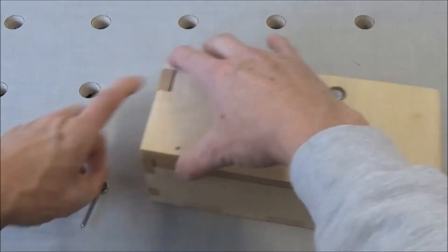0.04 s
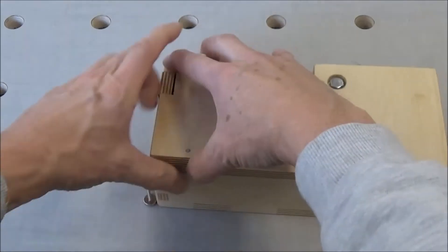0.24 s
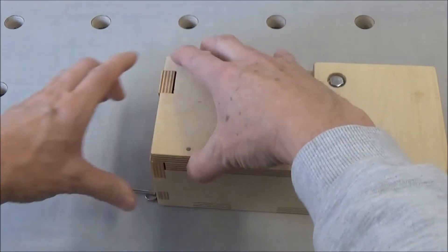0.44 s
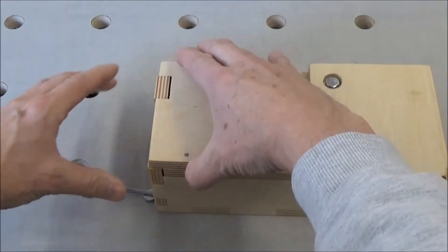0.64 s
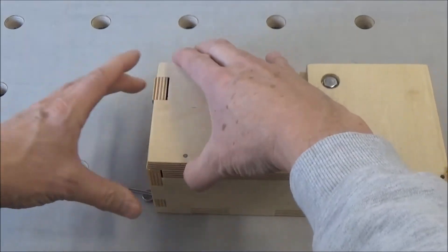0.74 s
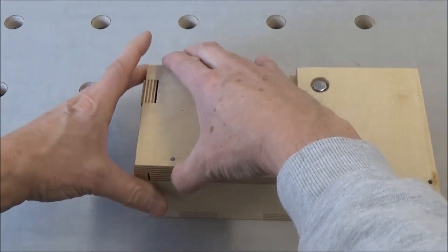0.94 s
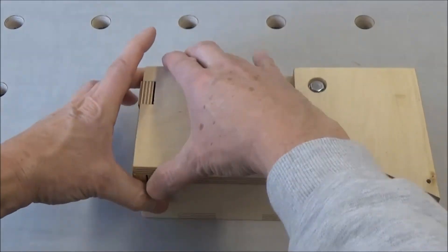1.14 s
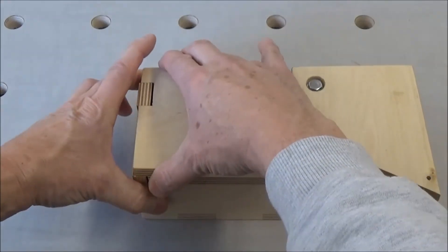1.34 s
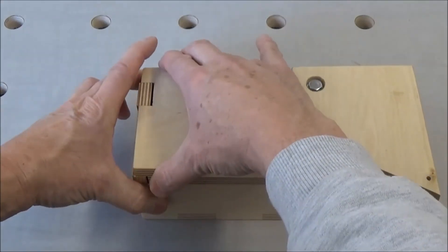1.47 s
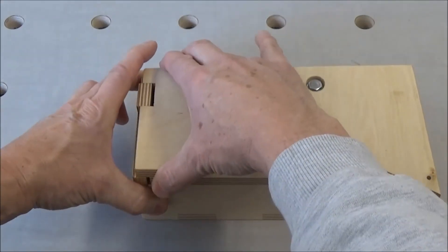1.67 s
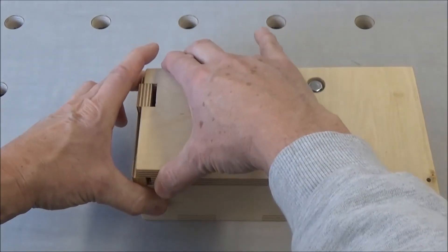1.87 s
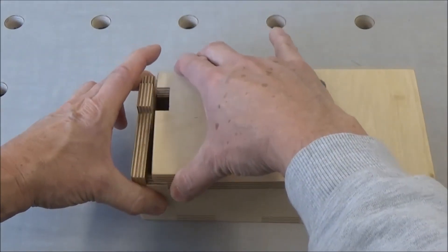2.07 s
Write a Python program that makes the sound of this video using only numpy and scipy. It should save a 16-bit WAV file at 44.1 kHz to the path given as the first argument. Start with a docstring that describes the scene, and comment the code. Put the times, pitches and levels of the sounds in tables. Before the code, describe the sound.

Wood scraping and clattering as a lidded box is shoved along a bench, then softer rubbing.

```python
"""A plywood box scrapes, knocks and chatters with its loose lid as it is shoved round on a workbench.
Two softer slides follow, fingers bump the wood, a catch clicks and the lid starts to slide open.
Friction drives the wood's resonances with many tiny slips; each blow leaves them ringing freely.
Mains hum and a faint, fast ticking lie under the quiet workshop."""
import sys
import numpy as np
from scipy import signal
from scipy.fft import rfft, irfft, next_fast_len
from scipy.io import wavfile

SR = 44100
rng = np.random.default_rng(int(sys.argv[2]) if len(sys.argv) > 2 else 0)


def pcm_store(signal):
    """Save signal as 16-bit PCM."""
    levels = np.round(np.clip(np.atleast_2d(signal), -1, 1) * 32767)
    wavfile.write(sys.argv[1], SR, levels.astype(np.int16).T)


N = 92830

# Resonances of the box. Each row: frequency in Hz, width in Hz, lift in dB.
BOX_RESONANCES = [(202, 23, 4.5), (318, 92, 6), (464, 57, 6.5), (630, 41, 7), (915, 83, 10), (1257, 38, 6),
                  (1654, 21, 13.5), (2200, 250, 7), (2920, 34, 15), (3250, 83, 7.5)]
# Stereo width of scrapes and clicks. Each row: frequency in Hz, side over mid in dB.
BOX_WIDTH = [(100, -33), (500, -32), (4500, -13.5), (9000, -17), (14000, -101)]


def amp(db):
    """Decibels to amplitude ratio."""
    return 10 ** (np.asarray(db) / 20)


def unit(x):
    """Normalisation to an rms of 1."""
    return x / np.sqrt(np.mean(x ** 2) + 1e-20)


def along(points, hz):
    """Interpolation of (Hz, value) points on a logarithmic frequency axis."""
    freqs, values = np.transpose(points)
    return np.interp(np.log(hz + 1), np.log(freqs + 1), values)


def lifts(modes, hz):
    """Resonance curve in dB: one Lorentzian peak for each mode."""
    return sum(db / (1 + (2 * (hz - centre) / width) ** 2) for centre, width, db in modes)


def coloured(x, db_of_hz):
    """Minimum-phase filter with the given gain in dB, made by folding the cepstrum."""
    size = 2 * next_fast_len(x.shape[-1] + 4096)
    gain = amp(db_of_hz(np.fft.rfftfreq(size, 1 / SR)))
    cepstrum = irfft(np.log(np.maximum(gain, 1e-6)))
    cepstrum[1:size // 2] *= 2
    cepstrum[size // 2 + 1:] = 0
    return irfft(rfft(x, size) * np.exp(rfft(cepstrum)), size)[..., :x.shape[-1]]


def band_pass(x, low_hz, high_hz, order=16):
    """Steep zero-phase band-pass; neighbouring bands add up flat."""
    size = next_fast_len(N + SR // 10)
    hz = np.fft.rfftfreq(size, 1 / SR) + 1
    attenuation = (1 + (low_hz / hz) ** order) * (1 + (hz / high_hz) ** order)
    return irfft(rfft(x, size) / attenuation, size)[..., :N]


def widened(pair, width):
    """Mid-side stereo: two unrelated signals give left as a sum and right as a difference."""
    side = coloured(pair[1], lambda hz: along(width, hz))
    return pair[0] + np.array([side, -side])


def ring(modes, t):
    """Free vibration: each mode is an exponentially damped sine."""
    return sum(amp(db - 60 * t / t60) * np.sin(2 * np.pi * hz * t) for hz, db, t60 in modes)


def add(track, start_s, sound):
    """Superposition of a sound on the track, in place."""
    part = track[int(start_s * SR):][:len(sound)]
    part += sound[:len(part)]


def impacts(blows, modes, rise_s=0.00005):
    """Impulse response: every blow sets the same modes ringing; the default rise is a hard contact."""
    track, t = np.zeros(N), np.arange(SR // 3) / SR
    for start_s, db in blows:
        add(track, start_s, amp(db) * ring(modes, t) * (1 - np.exp(-t / rise_s)))
    return track


def scrape(stroke, modes, slips_per_s=2600, slip_spread_db=3.5, smooth_share=0.54, fade_s=0.01):
    """Stick-slip friction: uneven slips and a smooth rub drive the wood; four bands follow the stroke."""
    # Friction spectrum of plywood. Each row: frequency in Hz, spectral level in dB.
    grain = [(100, -21), (170, -1), (500, 1.5), (760, -4.5), (1200, -2), (2250, -8), (2550, -13.5),
             (3700, -14.5), (5600, -18), (6300, -28), (8500, -23), (11500, -23.5), (13000, -33),
             (16000, -37)]
    # The scrape, rumble, rasp and treble bands. Each row: lower edge in Hz, upper edge in Hz.
    bands = [(550, 2500), (135, 550), (2500, 6300), (6300, 16000)]
    shape, t = (2, N), np.arange(N) / SR
    slips = (rng.random(shape) < slips_per_s / SR) * rng.choice([-1, 1], shape)
    slips = slips * amp(slip_spread_db * rng.standard_normal(shape))
    force = np.sqrt(1 - smooth_share) * unit(slips) + np.sqrt(smooth_share) * rng.standard_normal(shape)
    wood = coloured(force, lambda hz: along(grain, hz) + lifts(modes, hz))
    times, *band_levels = np.transpose(stroke)
    moving = np.interp(t, [times[0] - fade_s, times[0], times[-1], times[-1] + fade_s], [0, 1, 1, 0])
    gains = moving * amp([np.interp(t, times, db) for db in band_levels])
    rubbing = sum(gain * unit(band_pass(wood, *edges)) for gain, edges in zip(gains, bands))
    return widened(rubbing, BOX_WIDTH)


def workshop(air_db=-51):
    """Steady background: harmonics of the mains frequency hum over broadband air noise."""
    # Mains harmonics. Each row: frequency in Hz, rms level in dB.
    harmonics = [(59.2, -56), (118.4, -61.5), (177.6, -58.5)]
    # Air noise. Each row: frequency in Hz, spectral level in dB.
    air_spectrum = [(25, -2.5), (70, -5), (100, 2), (450, 1.5), (750, -4.5), (1500, -1.5), (2150, -8),
                    (4500, -12), (7000, -14), (15500, -16)]
    # Stereo width of the air. Each row: frequency in Hz, side over mid in dB.
    air_width = [(60, -20.5), (900, -3), (4000, -1.5), (15000, -23)]
    t = np.arange(N) / SR
    hum = sum(np.sqrt(2) * amp(db) * np.sin(2 * np.pi * (hz * t + rng.random())) for hz, db in harmonics)
    air = unit(coloured(rng.standard_normal((2, N)), lambda hz: along(air_spectrum, hz)))
    return hum + amp(air_db) * widened(air, air_width)


def shove():
    """Forced vibration: friction on the bench drives the box, pressed hard and damped by the hand."""
    # The shove. Each row: time in seconds, then scrape, rumble, rasp and treble levels in dB.
    stroke = [(0.005, -50.5, -46.5, -57, -49.5), (0.032, -60, -50, -58, -54),
              (0.046, -39.5, -40.5, -37.5, -39), (0.066, -30, -25.5, -41.5, -39.5),
              (0.082, -24.5, -27, -30.5, -35.5), (0.11, -25.5, -24.5, -34.5, -38.5),
              (0.14, -31.5, -28.5, -39.5, -45.5), (0.18, -28.5, -32, -31.5, -41),
              (0.212, -29.5, -31, -34.5, -45.5), (0.245, -32, -44.5, -30.5, -36.5),
              (0.285, -28, -38, -30.5, -39.5), (0.375, -37, -43.5, -42, -52.5),
              (0.435, -39.5, -45.5, -45.5, -47), (0.485, -42.5, -55, -49.5, -61),
              (0.55, -60, -54, -65, -76)]
    # Resonances of the pressed box. Each row: frequency in Hz, width in Hz, lift in dB.
    pressed_modes = [(226, 20, 6), (473, 24, 9.5), (910, 87, 5), (1324, 59, 6.5), (1636, 24, 8),
                     (2114, 350, 8.5), (3500, 690, 2)]
    return scrape(stroke, pressed_modes)


def edge_clicks(rise_s=0.000048):
    """Brief contacts have broad spectra: hard edges meet in cracks coloured by the box's resonances."""
    # Contacts of the chattering lid and of edges on the bench. Each row: start in seconds,
    # level in dB, 60 dB decay time in seconds, centre in Hz, width in octaves.
    contacts = [(0.04, -23.5, 0.008, 1340, 0.18), (0.1496, -15.5, 0.014, 3880, 2.2),
                (0.1495, -21, 0.034, 10900, 0.34), (0.1633, -21.5, 0.016, 9000, 2.3),
                (0.2044, -23, 0.0059, 9500, 1.2), (0.2203, -4, 0.0062, 7000, 1),
                (0.224, -25, 0.07, 8400, 0.75), (0.2312, -8.5, 0.006, 11100, 0.78),
                (0.2388, -17, 0.021, 9500, 1.5), (0.2609, -18.5, 0.037, 5060, 1.3),
                (0.2652, -23, 0.0046, 11000, 1.2), (0.2756, -21, 0.0089, 8600, 0.91),
                (0.3215, -27, 0.006, 10000, 1.3), (1.9253, -35, 0.0094, 5000, 1.7)]
    # Spectrum common to all clicks. Each row: frequency in Hz, gain in dB.
    spectrum = [(150, -42), (500, 17), (2200, -2), (5400, 2.5), (6500, -5), (8800, -0.5), (12300, -0.5),
                (13300, -9), (16000, -12)]
    track, t = np.zeros(N), np.arange(SR // 10) / SR
    for start_s, db, t60, centre_hz, octaves in contacts:
        def colour(hz):
            detuning = np.log2((hz + 1) / centre_hz) / octaves
            return along(spectrum, hz) + lifts(BOX_RESONANCES, hz) - 20 * np.log10(1 + detuning ** 2)
        noise = rng.choice([-1., 1.], len(t))
        crack = noise * amp(-60 * t / t60) * (1 - np.exp(-t / rise_s))
        add(track, start_s, amp(db) * coloured(crack, colour) / coloured(noise, colour).std())
    return track


def finger_bumps(rise_s=0.0031, t60_s=0.028):
    """Soft impact: a fingertip yields on contact and excites one low, heavily damped mode."""
    # Fingers on the box. Each row: start in seconds, level in dB, frequency in Hz.
    touches = [(0.042, -17, 150), (0.065, -8, 154), (0.384, -30, 175), (0.424, -26, 175),
               (0.596, -28.5, 175), (0.744, -30, 188), (1.526, -27, 168), (1.767, -26.5, 213),
               (1.926, -23.5, 200)]
    return sum(impacts([(start_s, db)], [(hz, 0, t60_s)], rise_s) for start_s, db, hz in touches)


def box_knocks():
    """Impact excitation: the box knocks on the bench and booms as it starts off, faintly when nudged."""
    # Knocks on the bench. Each row: start in seconds, level in dB.
    blows = [(0.0714, -12.5), (0.708, -42)]
    # Modes of the struck box. Each row: frequency in Hz, level in dB, 60 dB decay time in seconds.
    modes = [(217.2, -8, 0.2), (281, -12, 0.24), (630, -26, 0.13), (1182, 2, 0.033), (1380, -13, 0.015),
             (1290, -6, 0.14)]
    return impacts(blows, modes)


def lid_claps():
    """Repeated impact: the loose lid claps down twice, then chatters and rings in its plate modes."""
    # Claps of the lid. Each row: start in seconds, level in dB.
    blows = [(0.149, -17), (0.1536, -20), (0.187, -32), (0.2016, -37), (0.2385, -29), (0.2616, -26),
             (0.636, -55)]
    # Modes of the struck lid. Each row: frequency in Hz, level in dB, 60 dB decay time in seconds.
    modes = [(1643, -17, 0.074), (2204, -0.5, 0.04), (4320, 0, 0.013), (4686, 1, .016)]
    return impacts(blows, modes)


def ticking(first_s=0.5375, period_s=0.03335, count=36, strong_db=-45.5, weak_db=-49, rattle_db=-58):
    """Periodic excitation: a small mechanism ticks strong and weak in turn; a soft rattle trails each."""
    # Modes of the tick. Each row: frequency in Hz, level in dB, 60 dB decay time in seconds.
    tick_modes = [(2540, -4.5, 0.029), (2760, 1, 0.0097), (3303, 2, 0.018), (3830, -6, 0.0045)]
    # The rattle's one mode, with the same columns.
    rattle_modes = [(3260, 0, 0.017)]
    tick_swell_s, rattle_swell_s = 0.0012, 0.0048
    track, t = np.zeros(N), np.arange(SR // 30) / SR
    for k in range(count):
        tick = (weak_db if k % 2 else strong_db, tick_swell_s, tick_modes)
        rattle = (rattle_db, rattle_swell_s, rattle_modes)
        for db, swell_s, modes in (tick, rattle):
            rasp = rng.standard_normal(len(t)) * t / swell_s * np.exp(1 - t / swell_s)
            ringing = signal.fftconvolve(rasp, ring(modes, t))
            ringing *= np.linalg.norm(rasp) / np.linalg.norm(ringing)  # same energy as the rasp
            add(track, first_s + k * period_s, amp(db) * ringing)
    return track


def soft_slides():
    """Sliding friction: a nudge and then a longer slide gently drive the box's resonances."""
    # Both slides. Each row: time in seconds, then scrape, rumble, rasp and treble levels in dB.
    stroke = [(0.569, -58, -64, -59, -59), (0.632, -39, -44.5, -51, -55), (0.672, -50, -50, -64, -70),
              (0.712, -40, -43, -50, -56), (0.803, -53.5, -54.5, -70, -80), (0.853, -38.5, -54, -50.5, -60),
              (0.96, -35.5, -40, -48, -51), (1.03, -33.5, -43.5, -48.5, -54.5),
              (1.074, -46, -50.5, -62, -67), (1.18, -53, -52.5, -58.5, -56.5), (1.281, -59, -62, -61, -66)]
    return scrape(stroke, BOX_RESONANCES)


def catch_snap():
    """A small, stiff part has high, short-lived modes: the catch strikes twice in one click."""
    # Strikes of the catch. Each row: start in seconds, level in dB.
    blows = [(1.7452, -34), (1.7468, -30)]
    # Modes of the catch. Each row: frequency in Hz, level in dB, 60 dB decay time in seconds.
    modes = [(2800, -2.5, 0.014), (3320, 3, 0.0092), (5700, -4, 0.0066), (8400, -9, .005)]
    return impacts(blows, modes)


def lid_slide():
    """Friction in the groove drives the lid's own resonances as it starts to open."""
    # The lid's travel. Each row: time in seconds, then scrape, rumble, rasp and treble levels in dB.
    stroke = [(1.936, -54, -49, -62, -62), (1.944, -54, -59, -59, -67), (1.98, -43, -44, -49.5, -52),
              (2.004, -45, -52, -54.5, -56), (2.1, -40.5, -38.5, -49, -52)]
    # Resonances of the lid. Each row: frequency in Hz, width in Hz, lift in dB.
    modes = [(300, 85, 13), (1230, 390, 8.8), (1594, 13, 16), (2220, 530, 7.1), (4040, 580, 7.6),
             (5350, 810, 8.4)]
    return scrape(stroke, modes)


def room(x, level_db=-15):
    """Reverberation: convolution with a short tail of decaying noise, different at each ear."""
    # Decay of the room. Each row: frequency in Hz, reverberation time in seconds.
    decay_times = [(200, 0.028), (2000, 0.42), (10000, 0.021)]
    hz, t, spectra = signal.stft(rng.standard_normal((2, SR // 3)), SR, nperseg=256)
    decay = amp(-60 * t / along(decay_times, hz)[:, None])
    _, tail = signal.istft(spectra * decay, SR, nperseg=256)
    return amp(level_db) * signal.fftconvolve(x, tail / np.linalg.norm(tail[0]), axes=1)[:, :N]


def scene(pan_db=0.4, bass_cutoff_hz=140):
    """The sources superpose; a level difference between the ears sets the box just left of centre."""
    rubbing = shove() + soft_slides() + lid_slide()
    clicks = widened([edge_clicks(), edge_clicks()], BOX_WIDTH)
    blows = finger_bumps() + box_knocks() + lid_claps() + catch_snap()
    low_cut = signal.butter(4, bass_cutoff_hz, "highpass", fs=SR, output="sos")  # the blows carry no deep bass
    box = rubbing + clicks + signal.sosfilt(low_cut, blows)
    return (box + room(box)) * amp([[pan_db], [-pan_db]]) + ticking() + workshop()


def record(dry, ceiling=0.72, top_hz=15900):
    """Soft saturation rounds off the highest peaks; a band limit then removes the extreme treble."""
    rounded = dry / (1 + np.abs(dry / ceiling) ** 6) ** (1 / 6)
    size = next_fast_len(N + SR // 2)
    in_band = np.fft.rfftfreq(size, 1 / SR) < top_hz
    return irfft(rfft(rounded, size) * in_band, size)[:, :N]


dry = scene()
out = record(dry)
pcm_store(out)
```